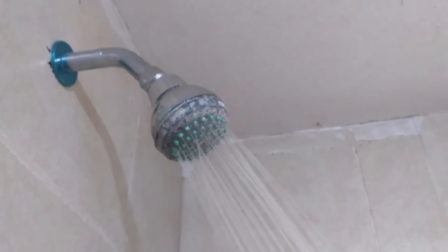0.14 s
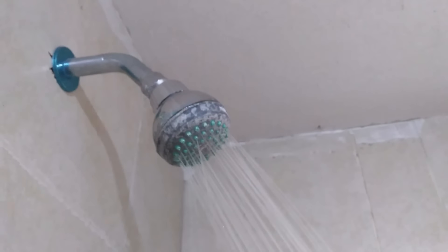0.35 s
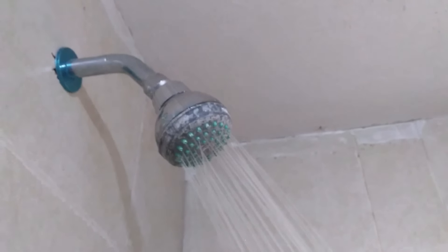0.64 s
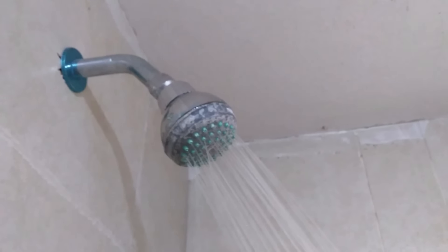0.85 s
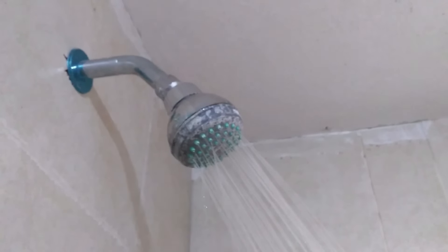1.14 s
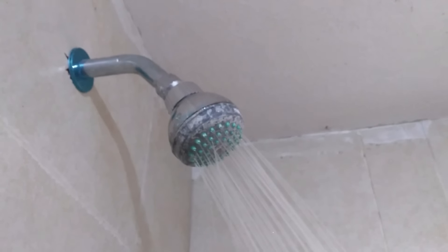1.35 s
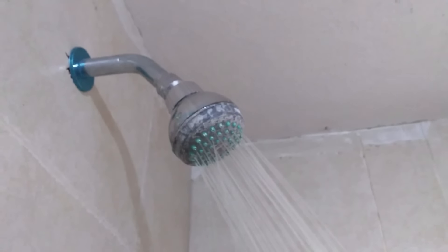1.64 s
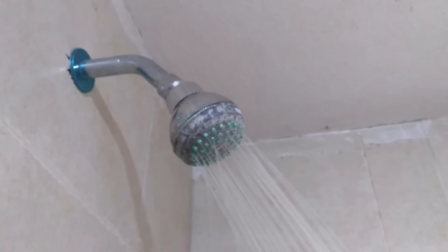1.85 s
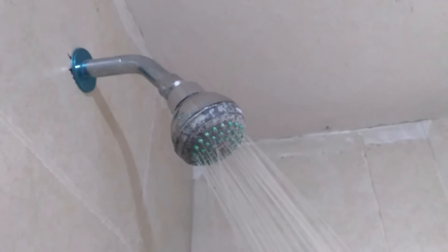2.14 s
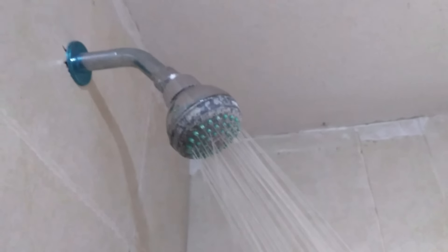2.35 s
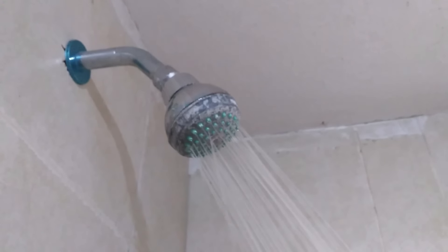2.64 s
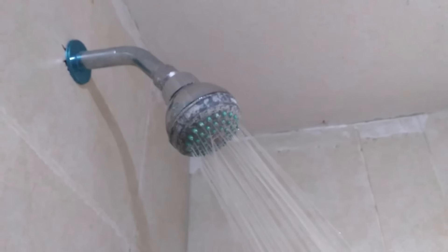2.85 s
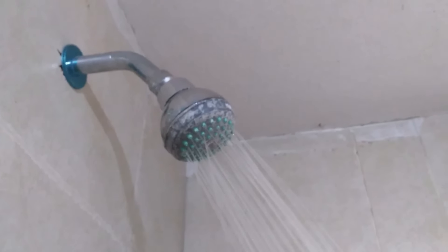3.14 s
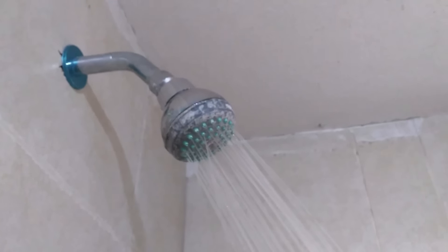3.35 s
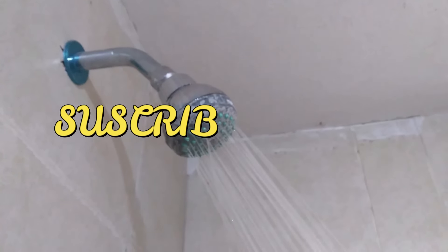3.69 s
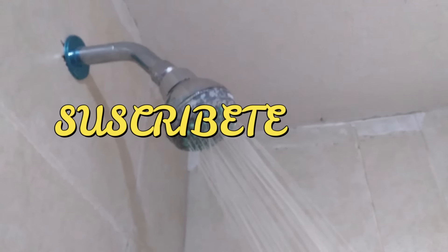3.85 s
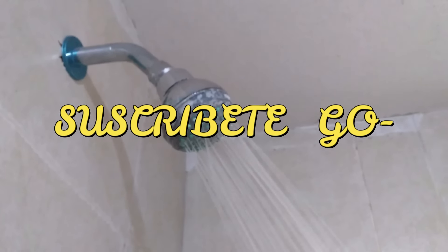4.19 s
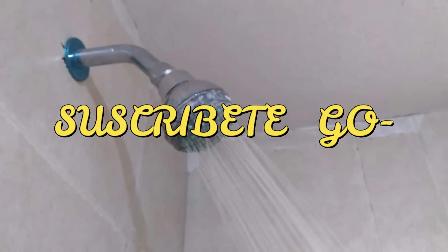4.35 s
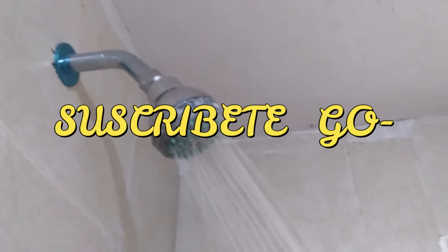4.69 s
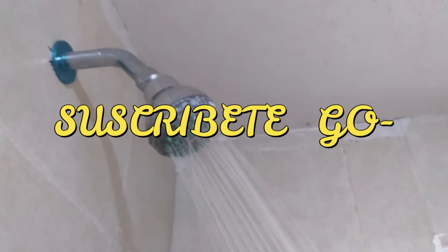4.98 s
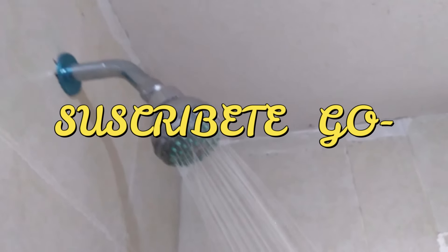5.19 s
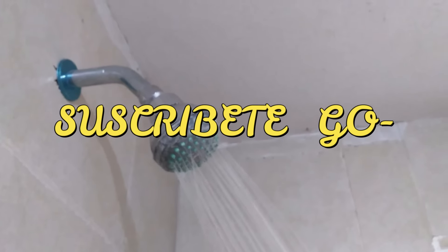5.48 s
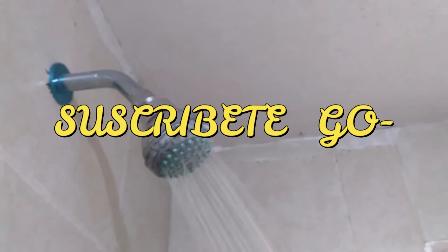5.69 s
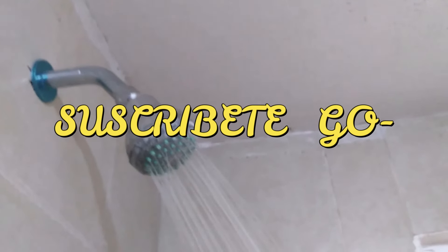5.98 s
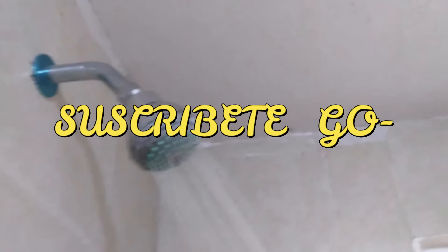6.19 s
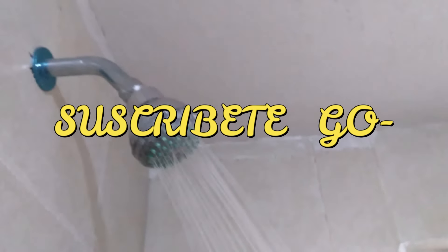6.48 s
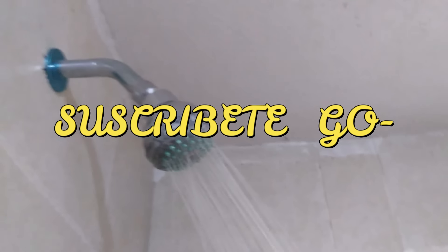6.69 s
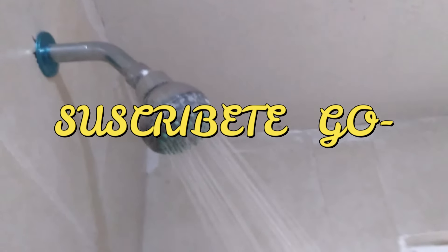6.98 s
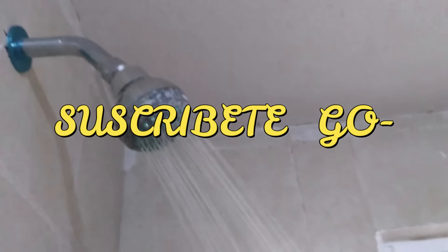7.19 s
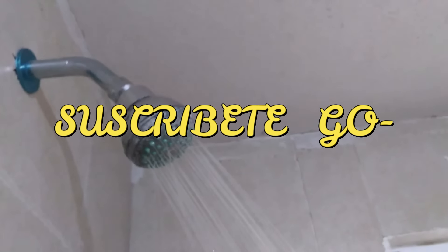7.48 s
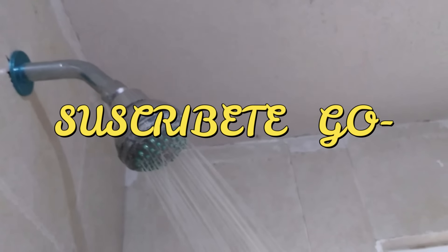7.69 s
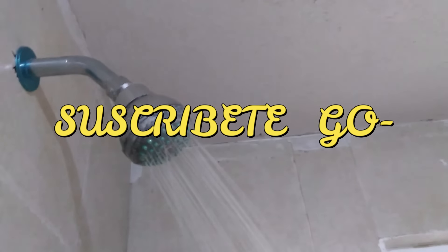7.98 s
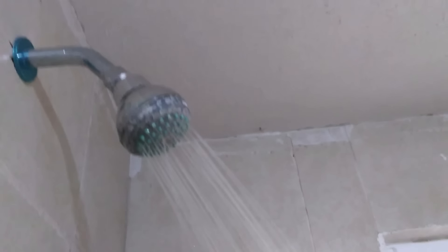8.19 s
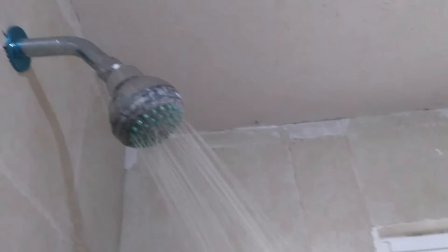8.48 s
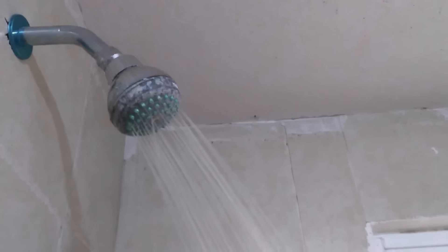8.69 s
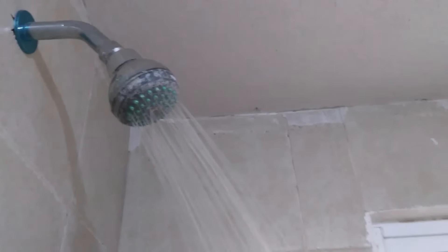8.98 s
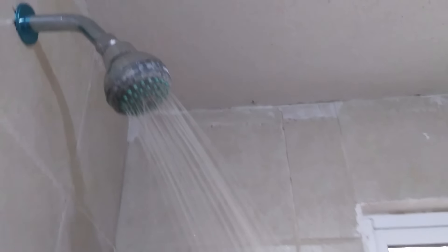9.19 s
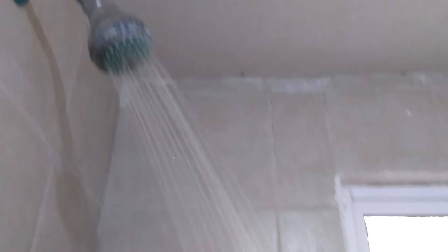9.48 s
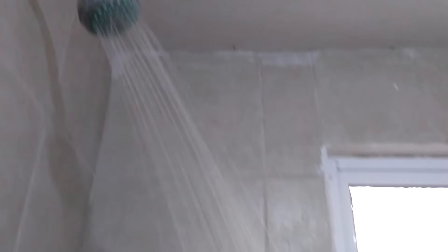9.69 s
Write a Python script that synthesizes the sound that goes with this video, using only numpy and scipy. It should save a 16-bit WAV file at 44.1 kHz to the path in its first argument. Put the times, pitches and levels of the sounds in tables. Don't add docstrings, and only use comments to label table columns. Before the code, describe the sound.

A shower runs at full flow in a tiled bathroom, hissing and spattering steadily, growing closer and louder with heavy low splashes near the end.

```python
import sys
import numpy as np
from scipy import signal
from scipy.fft import rfft, irfft
from scipy.io import wavfile
from scipy.ndimage import uniform_filter1d

SR = 44100
rng = np.random.default_rng(int(sys.argv[2]) if len(sys.argv) > 2 else 0)


def wav_out(sig):
    wavfile.write(sys.argv[1], SR, np.round(np.clip(np.atleast_2d(sig).T, -1, 1) * 32767).astype(np.int16))


def elevation(decibels):
    levels = np.asarray(decibels, float)
    return 10 ** (levels / 20)


N = 433944
HZ = np.fft.rfftfreq(N, 1 / SR)
PORT_LAG_S = 20.6 / SR
DRUM_HZ, SPATTER_HZ = 200, 3000


def evened(x):
    return x / np.sqrt(np.mean(x ** 2) + 1e-20)


def read(points, hz):
    f, value = np.transpose(points)
    return np.interp(np.log(hz + 1), np.log(f + 1), value)


def arch(t, middle, length):
    return np.cos(np.pi * np.clip((t - middle) / length, -.5, .5)) ** 2


def swelling(rows):
    t = np.arange(0, N + 256, 256) / SR
    level = sum(elevation(db) * arch(t, middle, length) for middle, length, db in rows)
    return np.interp(np.arange(N) / SR, t, level)


# [t/s, level/dB]
APPROACH = [(0.0, -1.4), (0.7, -2.3), (1.4, -3.5), (2.1, -0.5), (2.9, -3), (3.6, -0.1), (4.4, -0.9),
            (5.1, -3), (5.7, 0.45), (6.4, -0.5), (7.0, 1.9), (7.6, -0.4), (8.1, 3), (8.6, 6.5), (9.2, 4.5),
            (9.84, 5)]
# [f/Hz, share/1]
APPROACH_SHARE = [(200, 0.59), (500, 0.66), (1500, 1.48), (4000, 1.49), (11000, 0.47)]
# [middle t/s, length t/s, level/dB, centre f/Hz]
SHEETS = [(0.26, 0.32, 4.5, 8000), (0.303, 0.12, 3.6, 1200), (0.603, 0.071, 3.8, 3000),
          (0.893, 0.26, 1.5, 1200), (1.256, 0.21, 5, 3000), (1.474, 0.24, 3, 1220), (1.58, 0.68, 4.1, 3000),
          (1.992, 0.34, 5, 1150), (2.172, 0.12, 3, 8050), (2.726, 1, 1.6, 8000), (3.057, 0.08, 7, 1200),
          (3.462, 0.16, 4.5, 1210), (3.552, 0.13, 2.5, 8000), (3.9, 0.08, 2, 3000),
          (4.054, 0.21, 3.5, 8000), (4.18, 0.26, 2.5, 1200), (4.46, 0.43, 2.5, 8000),
          (4.846, 0.26, 4, 1200), (5.42, 0.24, 3.5, 1200), (5.937, 0.26, 1.5, 1190), (6.37, 0.81, 2, 500),
          (6.97, 0.21, 0, 3000), (7.06, 0.31, -0.5, 1200), (7.203, 0.18, 4.5, 200), (7.214, 0.14, 4, 3050),
          (7.662, 0.071, 4.5, 1160), (7.68, 0.18, 7, 200), (8.28, 0.48, 11.5, 200), (9.157, 0.15, 3, 3000)]
# [middle t/s, length t/s, level/dB, centre f/Hz]
THINNINGS = [(0.452, 0.16, -5.5, 7900), (0.695, 0.36, -1, 497), (1.372, 0.98, -2.7, 8100),
             (1.556, 0.19, -6.5, 8000), (1.79, 0.34, -2.3, 3000), (2.265, 0.2, -1.5, 3000),
             (2.53, 0.37, -3.5, 1200), (3.15, 0.18, -2.5, 8000), (3.17, 0.15, -4.0, 500),
             (3.74, 1, -2, 500), (4.637, 0.18, -4.5, 2980), (4.7, 0.29, -6, 200), (5.103, 0.31, -2.7, 8000),
             (5.675, 0.26, -3.4, 1200), (6.75, 0.25, -2.3, 8000), (6.8, 0.55, -2.2, 200),
             (6.833, 0.26, -6, 1210), (7.327, 0.18, -4.7, 200), (7.358, 0.23, -1.5, 8000),
             (8.095, 0.34, -4, 3000), (8.456, 0.22, -4, 8000), (8.47, 0.42, -3.5, 500),
             (8.93, 0.13, -4.5, 3000), (9.61, 0.65, -1, 200), (9.654, 0.18, -4, 8000)]


def flow_db(t, hz):
    hz = np.atleast_1d(hz)
    nearness = np.outer(read(APPROACH_SHARE, hz), np.interp(t, *np.transpose(APPROACH)))
    middle, length, db, centre = np.transpose(SHEETS + THINNINGS)[:, :, None]
    octaves = np.log2((hz + 1) / centre)
    spread = np.exp(-(octaves / 1.67) ** 2)
    return nearness + (db * spread).T @ arch(t, middle, length)


def flow_gain(hz):
    t = np.arange(0, N + 256, 256) / SR
    return elevation(np.interp(np.arange(N) / SR, t, flow_db(t, hz)[0]))


def likeness():
    return np.sinc(2 * HZ * PORT_LAG_S)


# [f/Hz, level/dB]
PORT_TILT = [(140, -16), (320, 5.5), (550, -11), (1000, 10.5), (1600, -6), (2600, 1), (3600, -1),
             (5000, 1.5), (7000, 2), (9550, 1), (9950, 5), (14000, 2)]


def at_ports(x):
    left, other = rfft(x, axis=1)
    right = likeness() * left + np.sqrt(1 - likeness() ** 2) * other
    tilt = elevation(np.outer([.5, -.5], read(PORT_TILT, HZ)))
    return irfft(np.array([left, right]) * tilt, N)


# [f/Hz, level/dB]
WATER_COLOUR = [(25, -34), (55, -39), (120, -19), (300, -3), (500, -3.5), (900, -5), (1700, -1),
                (2300, -0.5), (3300, -8), (4500, -5), (6200, -8.5), (7200, -7), (10200, -7.5),
                (12000, -9.5), (14300, -11.5)]
# [f/Hz, width f/Hz, level/dB]
PAN_RESONANCES = [(638, 176, 7), (759, 31, 6), (860, 23, -5), (1184, 300, -5)]
# [f/Hz, level/dB]
PATCHINESS = [(200, -1.1), (1300, 3), (2500, 2), (5000, 1.6), (9000, 1.76)]


def spray():
    hop, hz = 128, np.fft.rfftfreq(512, 1 / SR)
    shape = (len(hz), N // hop + 5)

    def drifting(bins, frames):
        noise = uniform_filter1d(rng.standard_normal(shape), size=bins, axis=0)
        return evened(uniform_filter1d(noise, size=frames, axis=1))

    wander_db = 1 * drifting(140, 30)
    patches_db = read(PATCHINESS, hz)[:, None] * drifting(3, 16)
    rough = np.clip(hz / 2500, 0, 1)[:, None]
    clumps_db = 1.18 * rough * drifting(130, 5)
    level_db = flow_db(np.arange(shape[1]) * hop / SR, hz) + patches_db + clumps_db + wander_db

    noise = rng.standard_normal((2, *shape)) + 1j * rng.standard_normal((2, *shape))
    x = signal.istft(noise * elevation(level_db), nperseg=512, noverlap=512 - hop)[1][:, :N]
    pan_db = sum(db / (1 + (2 * (HZ - f) / width) ** 2) for f, width, db in PAN_RESONANCES)
    colour = elevation(read(WATER_COLOUR, HZ) + pan_db)
    return elevation(-38.5) * evened(irfft(rfft(x, axis=1) * colour, N))


def bubble(hz, cycles, rise):
    turns = np.arange(round(3 * cycles * SR / hz)) * hz / SR
    tone = np.sin(2 * np.pi * turns * (1 + rise * turns / cycles))
    return tone * np.exp(-2 * turns / cycles) * np.tanh(turns)


# [t/s, level/dB, f/Hz]
DISTINCT_BUBBLES = [(0.255, -40, 1580), (0.469, -49, 1240), (0.513, -48, 2340), (0.598, -45, 2360),
                    (0.818, -43.3, 2070), (0.844, -50, 1220), (1.06, -46.5, 1590), (1.438, -49, 1520),
                    (2.021, -42, 2490), (2.095, -38.5, 2200), (2.357, -52, 1210), (3.067, -52, 1280),
                    (3.448, -51, 1170), (3.87, -36, 2120), (4.079, -44, 2360), (4.472, -43, 2410),
                    (4.717, -50, 1290), (4.799, -53, 1440), (5.336, -47.5, 1244), (5.454, -37, 2100),
                    (5.886, -37, 2130), (5.993, -53.5, 980), (6.245, -49, 1300), (6.481, -53.5, 960),
                    (7.035, -55, 995), (7.112, -40.6, 1880), (7.154, -49, 1250), (7.181, -46, 2400),
                    (8.187, -48, 860), (8.253, -46, 1150),
                    (0.198, -41, 6900), (0.233, -37, 9220), (0.24, -38, 11710), (0.276, -46, 5170),
                 (0.602, -42, 4070), (1.076, -43.5, 3770), (1.178, -41, 4100), (1.683, -42, 9220),
                 (1.893, -44.5, 5230), (1.895, -42, 4000), (2.149, -33.5, 8200), (3.225, -40, 7410),
                 (4.84, -46, 5040), (4.926, -34, 11500), (5.446, -45, 4460), (5.723, -40, 4450),
                 (6.54, -39, 10340), (6.952, -41, 4100), (6.955, -39.5, 5070), (7.203, -35, 6000),
                 (7.213, -31.5, 4280), (7.977, -36.5, 5450), (8.141, -39, 5160), (8.251, -36, 6800),
                 (8.833, -77, 3620), (9.13, -34, 4260)]


def bubbles():
    x = np.zeros(N)
    for s, db, hz in DISTINCT_BUBBLES:
        pop = elevation(db + 16.0) * bubble(hz, 7.7, 0.043)
        x[round(s * SR):][:len(pop)] += pop
    flow = flow_gain(SPATTER_HZ)
    for hz in np.geomspace(1250, 12000, num=17):
        starts = rng.random(N) < 16.0 / SR
        size = elevation(-46.5 + 2.38 * np.minimum(rng.exponential(size=N), 4)) * starts
        x += signal.oaconvolve(size * flow, bubble(hz, 8.0, 0.048))[:N]
    return x


# [f/Hz, t/s]
TILE_DECAY = [(500, 0.68), (2000, 0.28), (6000, 0.15), (14000, 0.023)]


def tiles(x):
    hz, t, z = signal.stft(rng.standard_normal((2, SR // 3)), SR, nperseg=64)
    decay = elevation(-60 * t / read(TILE_DECAY, hz)[:, None])
    tail = signal.istft(z * decay, SR, nperseg=64)[1]
    tail /= np.linalg.norm(tail[0])
    tail[[0, 1], [0, 9]] += .58
    return signal.fftconvolve(x[None], tail, axes=1)[:, :N]


# [f/Hz, width f/Hz, level/dB]
AIR_MODES = [(90, 30, -69), (149.5, 8.7, -61), (191.4, 19, -68), (285, 6.8, -70), (322.4, 8.7, -64.5),
             (433.8, 5.4, -61), (511.7, 3.9, -64), (639, 7.2, -62), (1325, 6.7, -113), (1530, 4.8, -73),
             (1661.6, 6.8, -63)]
# [f/Hz, wander f/Hz]
TONE_MODES = [(73, 3.5), (214.5, 3.0)]
# [middle t/s, length t/s, top level/dB]
LOWEST_SWELLS = [(2.85, 0.14, -62), (3.23, 0.18, -62), (3.51, .35, -63), (4.1, 0.55, -69),
                 (4.57, 0.46, -66), (5.1, 1, -81), (5.68, 0.71, -63), (6.03, 0.18, -62),
                 (6.306, 0.36, -65.5), (6.6, 0.44, -77), (7.05, .45, -78), (7.4, 0.46, -73),
                 (7.745, 0.44, -57.5), (8.12, .25, -70), (8.35, 0.26, -59), (8.72, .35, -63),
                 (9.07, .4, -61.5), (9.5, .4, -67)]
# [middle t/s, length t/s, top level/dB]
SINGING_SWELLS = [(0.252, 0.34, -67), (.95, .4, -62), (1.45, .5, -78), (2.115, 0.33, -58.5),
                  (2.858, 0.13, -63), (3.37, 0.58, -60.5), (4.0, 0.32, -51), (4.6, 0.35, -54.5),
                  (4.87, 0.14, -60), (5.202, 0.68, -60), (5.79, 0.6, -62), (6.12, 0.42, -55.5),
                  (6.497, 0.65, -62), (7.102, 0.51, -56), (7.714, 0.38, -48.5), (8.03, 0.66, -57.5),
                  (8.318, 0.35, -41.5), (8.61, 0.44, -50), (9.05, 0.83, -48), (9.4, .3, -56.5),
                  (9.604, 0.18, -58.5), (9.782, .2, -52)]
TONE_REST = (-83, -65.5)


def stall():
    t = np.arange(N) / SR
    outside_db = -4.0 * np.clip((2.7 - t) / .5, 0, 1)
    wander = uniform_filter1d(uniform_filter1d(rng.standard_normal(N), size=2500), size=2500)
    drum_gain = elevation(outside_db + 2.5 * evened(wander)) * flow_gain(DRUM_HZ) ** 0.98
    drive = rfft(rng.standard_normal(N) * drum_gain)
    ring = sum(elevation(db) * np.sqrt(SR / np.pi / width) / (1 + 2j * (HZ - f) / width)
               for f, width, db in AIR_MODES)
    x = irfft(drive * ring, N)
    swells = (LOWEST_SWELLS, SINGING_SWELLS)
    for (hz, wander_hz), rows, rest_db, gain_db in zip(TONE_MODES, swells, TONE_REST, (8.0, 5.0)):
        level = elevation(rest_db) + swelling(rows)
        drift = evened(uniform_filter1d(rng.standard_normal(N), size=3000))
        phase = 2 * np.pi * np.cumsum(hz + wander_hz * drift) / SR
        x += level * elevation(gain_db) * np.sin(phase)
    return x


def ticks():
    starts = rng.random(N) < 60 / SR
    size = elevation(-41 + 4 * np.minimum(rng.exponential(size=N), 4)) * starts
    turns = np.arange(64) * 3500 / SR
    pulse = (1 - 4 * turns) * np.exp(-4 * turns)
    x = signal.oaconvolve(size * flow_gain(SPATTER_HZ), pulse)[:N]
    return np.array([x, np.roll(x, 9)])


def hum():
    flutter = evened(uniform_filter1d(rng.standard_normal(N), size=4000))
    return elevation(-78.0 + 6.2 * flutter) * np.sin(2 * np.pi * 49 * np.arange(N) / SR)


# [middle t/s, length t/s, rms level/dB]
HEAVY_SLUGS = [
    (2.03, .15, -61),
    (7.69, .14, -48),
    (8.2, 0.15, -43),
    (8.3, 0.13, -37),
]


def slugs():
    centre_hz, width_hz = 156, 120
    resonance = 1 / (1 + 2j * (HZ - centre_hz) / width_hz) ** 2
    boom = evened(irfft(rfft(rng.standard_normal(N)) * resonance, N))
    return boom * swelling(HEAVY_SLUGS)


def drop():
    t = np.maximum(np.arange(N) / SR - 6.6922, 0)
    turns = t * 2800
    tick = 1.5 * np.sin(2 * np.pi * turns) * turns * np.exp(-(turns / 1.45) ** 6)
    after = np.maximum(t - .0005, 0)
    recoil = -1.1 * np.sin(2 * np.pi * 800 * after) * np.exp(-after / .0006)
    sway = .12 * np.sin(2 * np.pi * 300 * after) * np.exp(-after / .005)
    return elevation(-17.5) * (tick + recoil + sway)


def scene():
    ports = at_ports(spray() + tiles(bubbles()))
    ports += stall() * elevation(np.array([[-.8], [.8]]))
    ports[1] += drop() + hum()
    return ports + slugs() + at_ports(ticks())


def band_limit(x):
    return signal.sosfilt(signal.butter(12, 14600, fs=SR, output="sos"), x)


# [f/Hz, share/1]
CROSS_SHARE = [(100, .95), (1000, .78), (2100, .92), (3200, .68), (4300, .6), (5600, .56), (6000, .27),
               (9000, .1), (14000, .03)]
# [f/Hz, level/dB]
CHANNEL_TRIM = [(100, -0.5), (300, 1.5), (900, -0.1), (1700, 2.5), (3500, 0.5), (14000, 5.5)]


def record(dry):
    share = np.clip(read(CROSS_SHARE, HZ), 0, 1)
    late = np.exp(-2j * np.pi * HZ * PORT_LAG_S)
    z = rfft(dry, axis=1)
    left_over = np.sqrt(1 + share ** 2 - 2 * share * likeness() * late.real + 0.076)
    z = (z - share * late * z[::-1]) / left_over
    rumble_cut = 1 / (1 + (40 / (HZ + 1)) ** 3)
    trim = elevation(np.outer([.5, -.5], read(CHANNEL_TRIM, HZ)))
    z *= trim * rumble_cut * (HZ < 14265)
    return band_limit(irfft(z, N))


dry = scene()
out = record(dry)
wav_out(out)
```